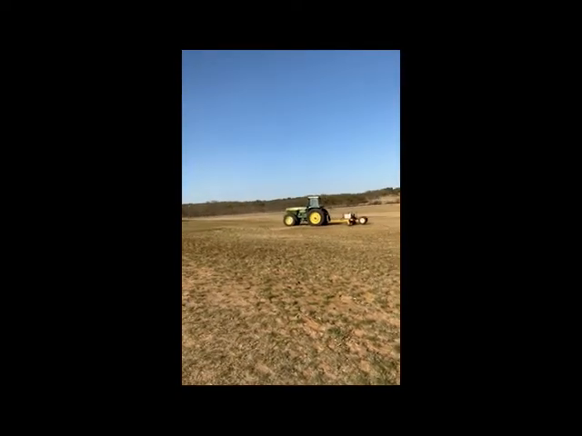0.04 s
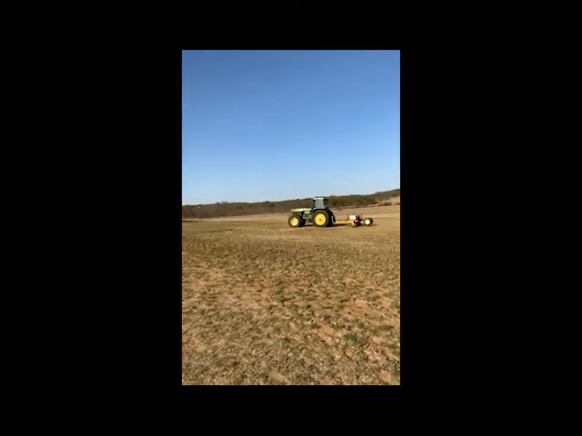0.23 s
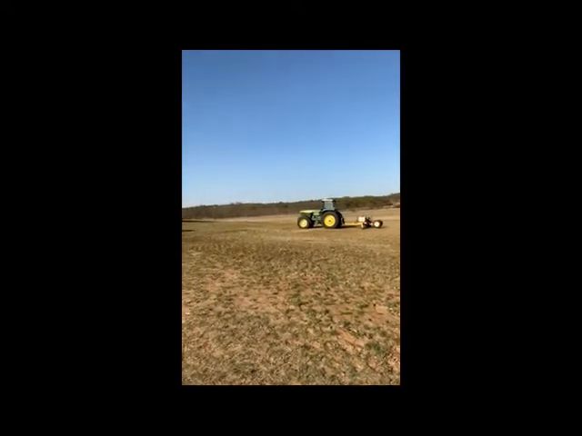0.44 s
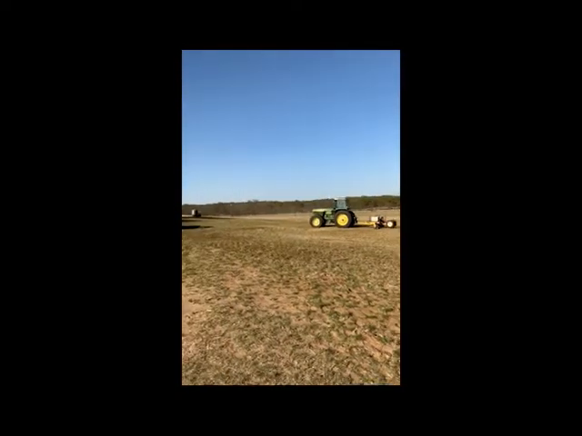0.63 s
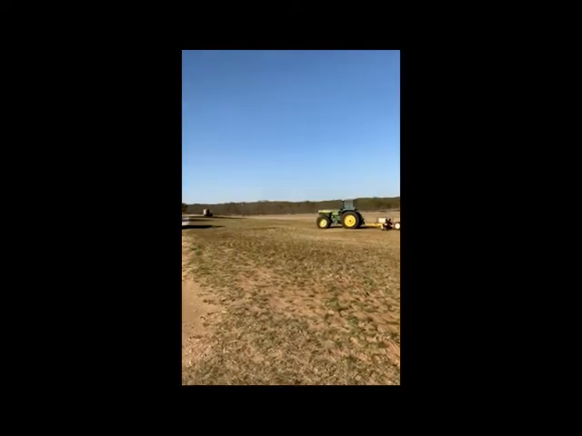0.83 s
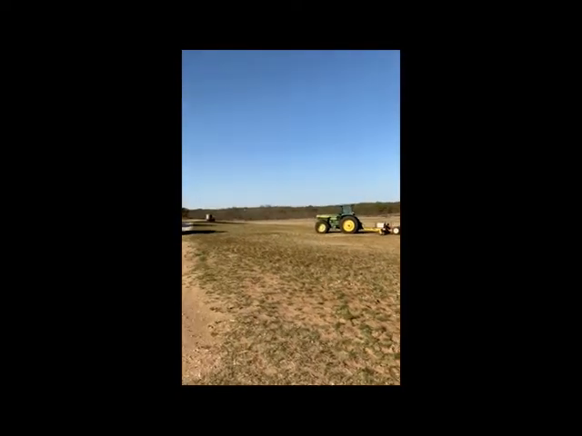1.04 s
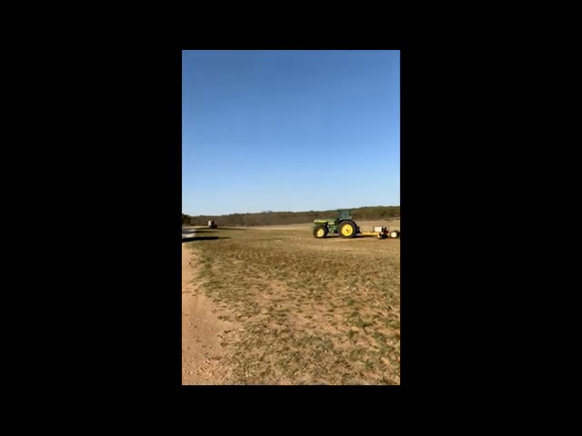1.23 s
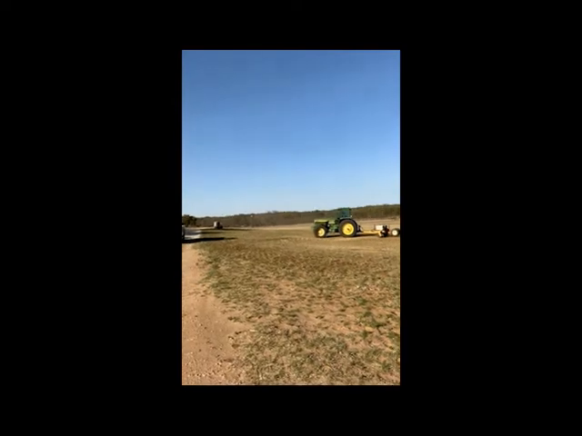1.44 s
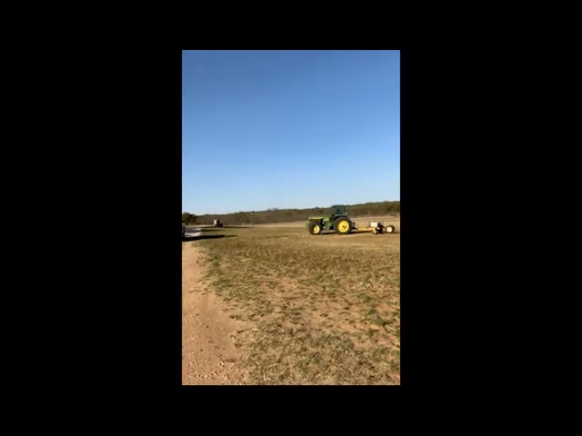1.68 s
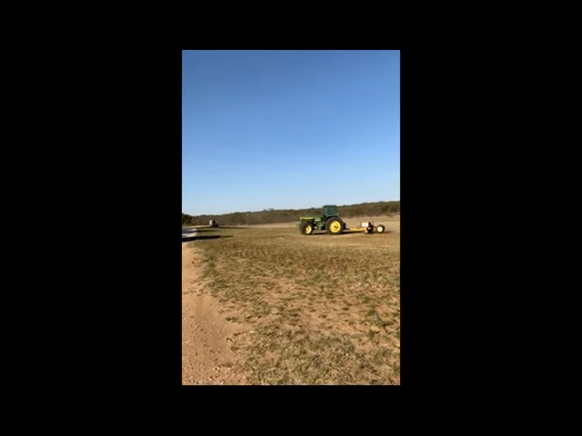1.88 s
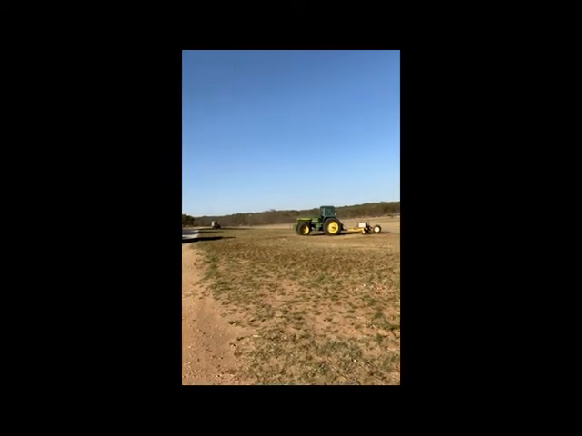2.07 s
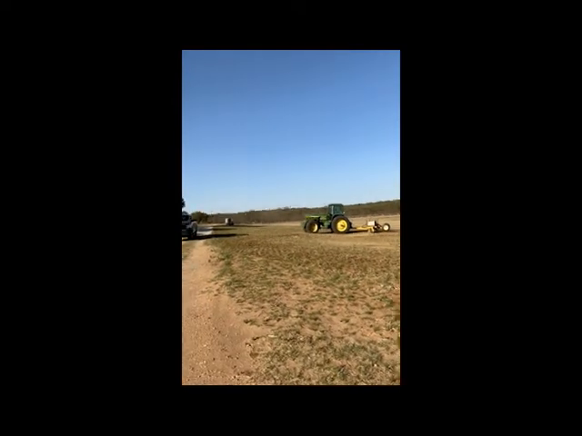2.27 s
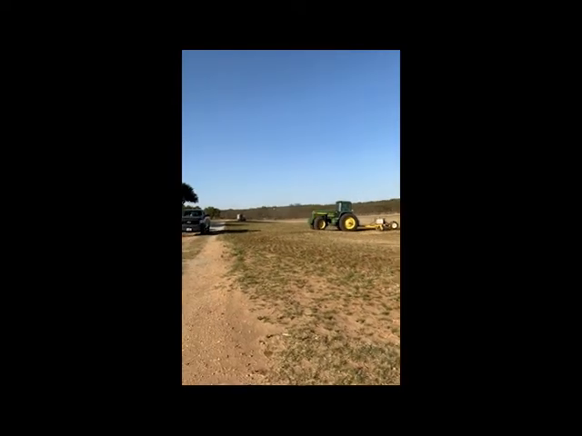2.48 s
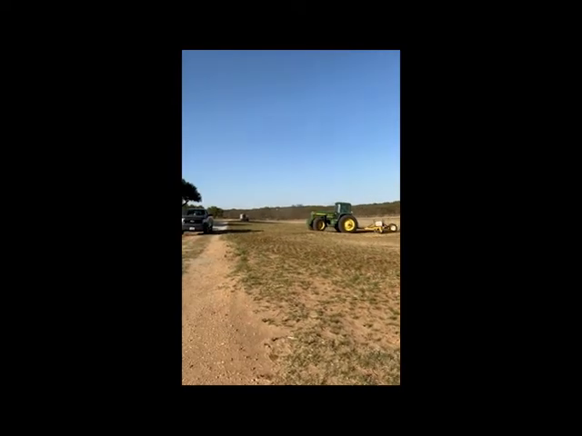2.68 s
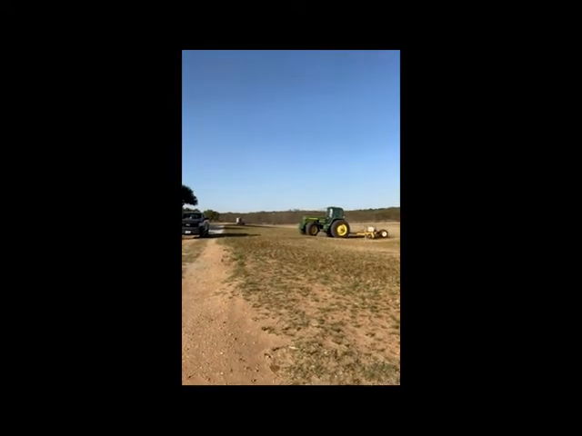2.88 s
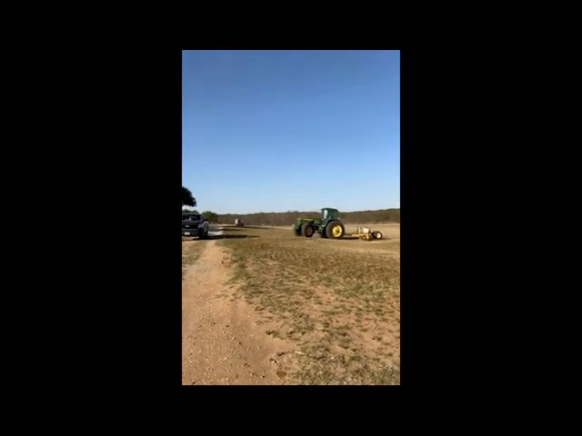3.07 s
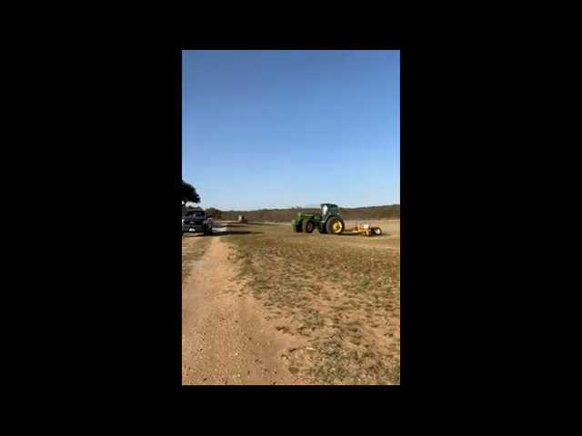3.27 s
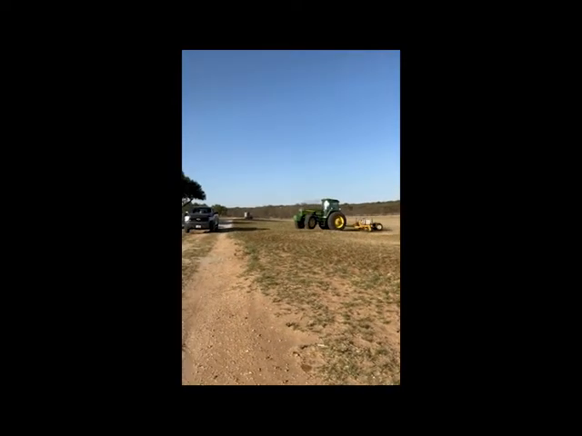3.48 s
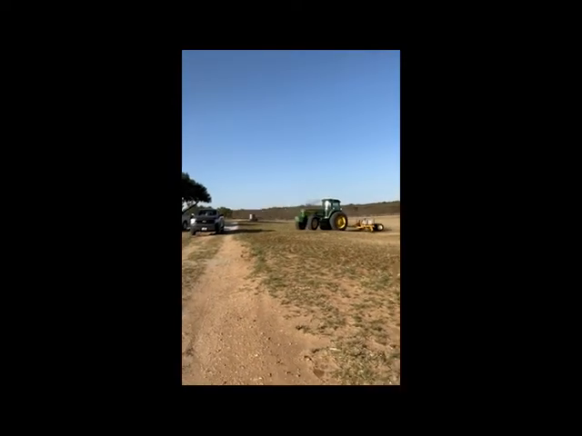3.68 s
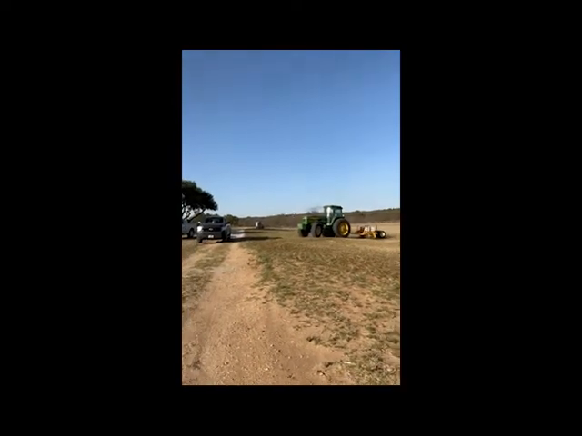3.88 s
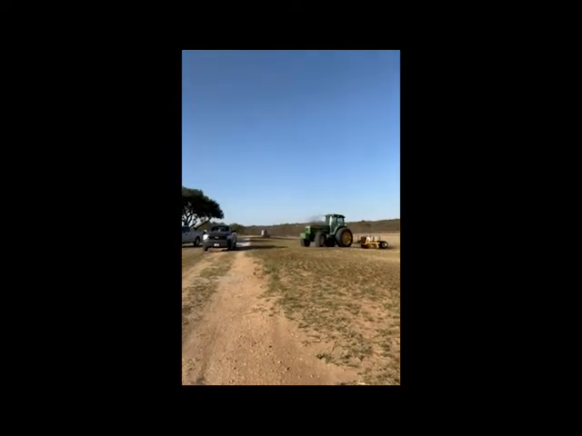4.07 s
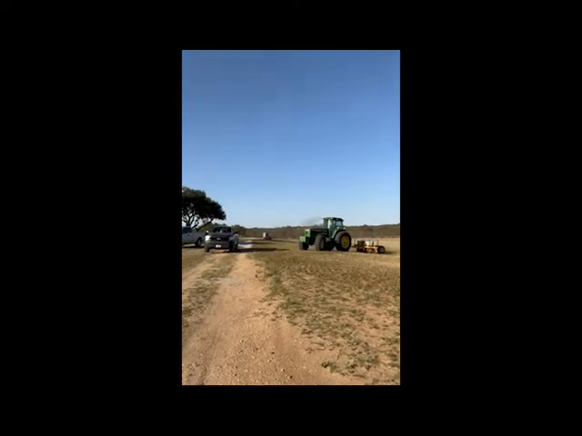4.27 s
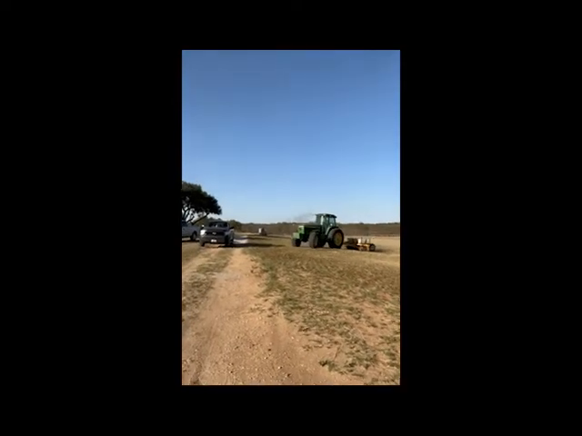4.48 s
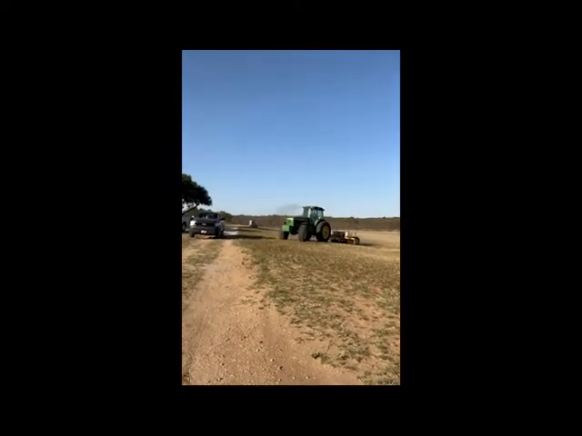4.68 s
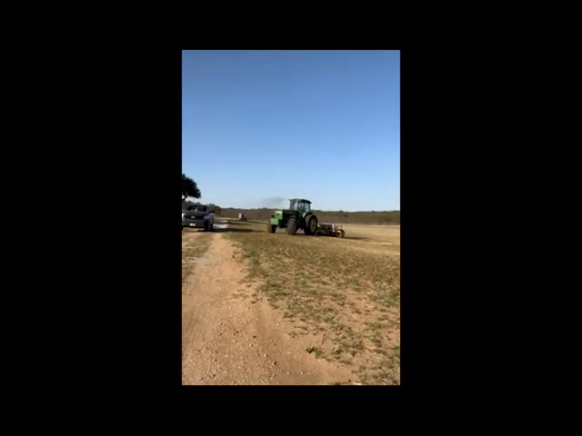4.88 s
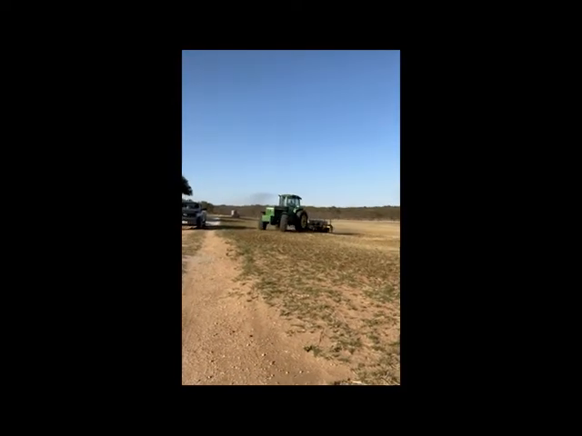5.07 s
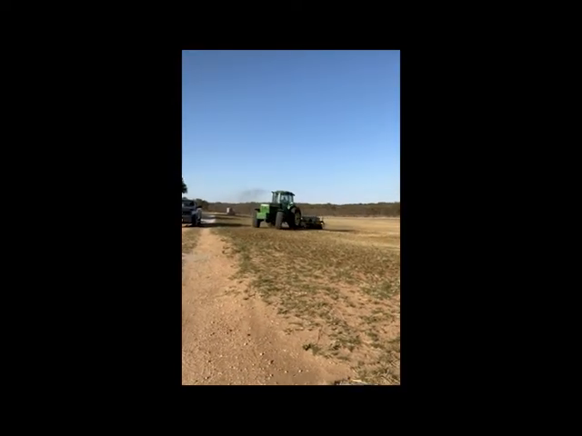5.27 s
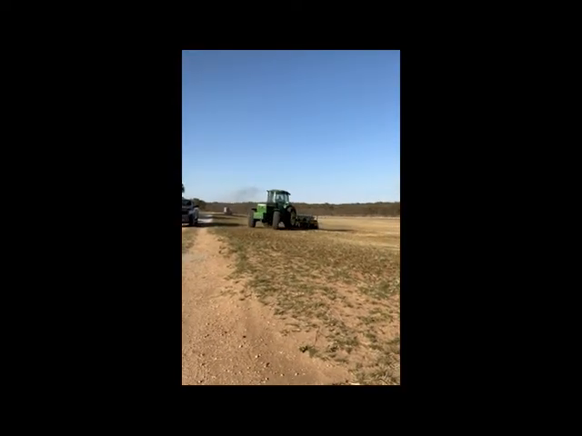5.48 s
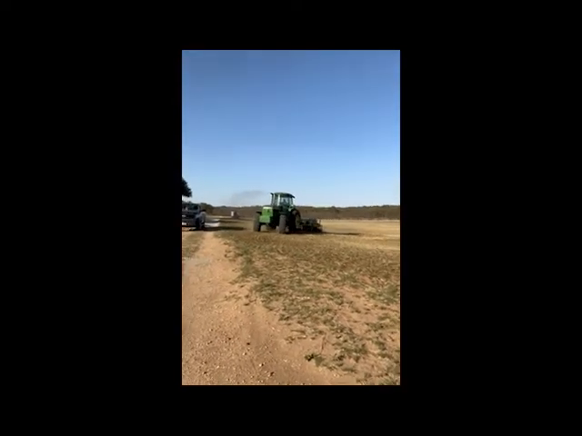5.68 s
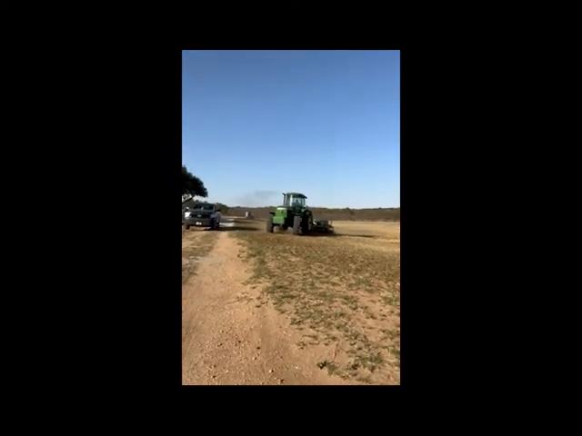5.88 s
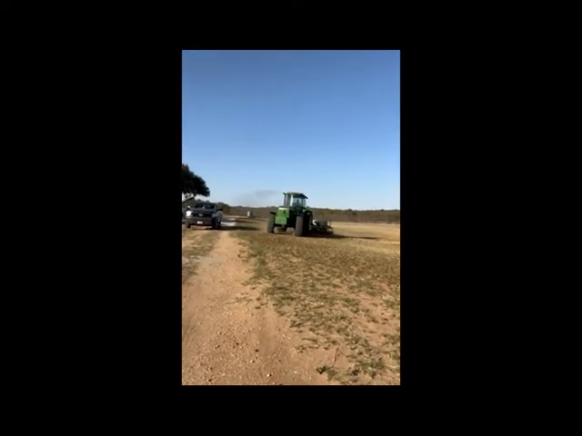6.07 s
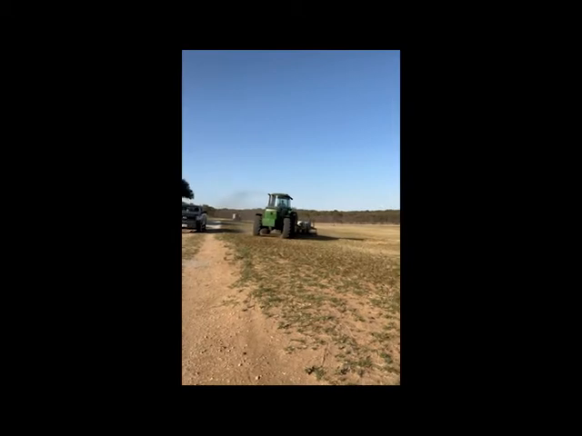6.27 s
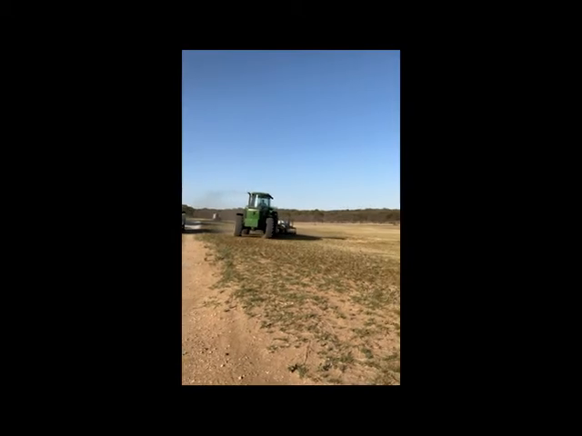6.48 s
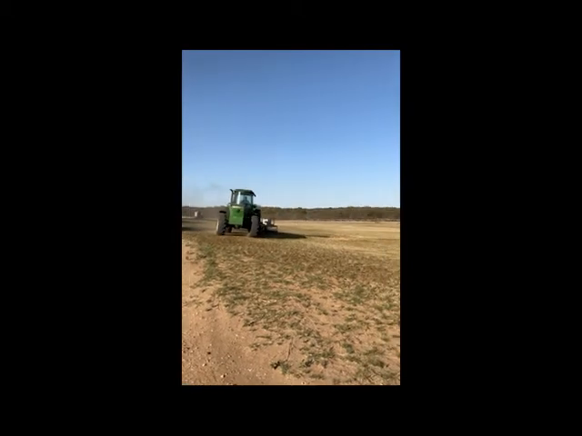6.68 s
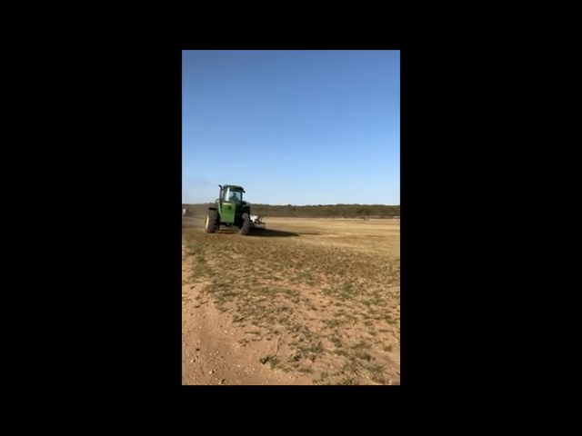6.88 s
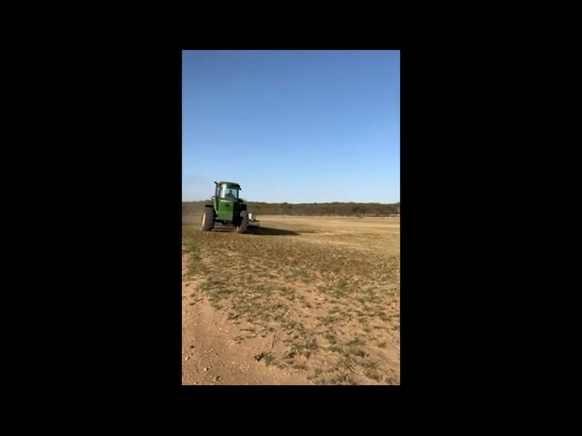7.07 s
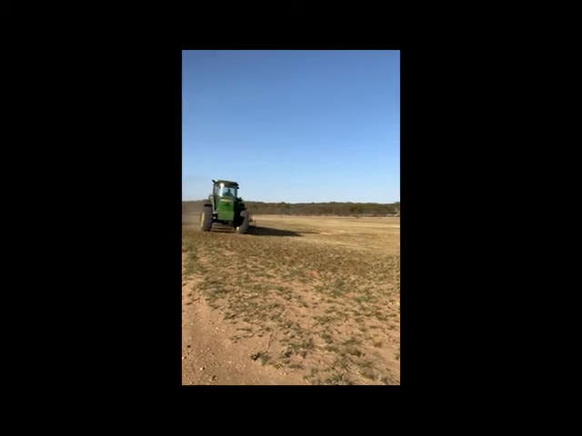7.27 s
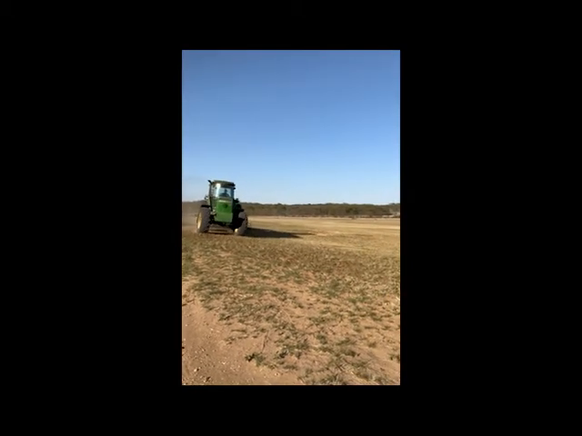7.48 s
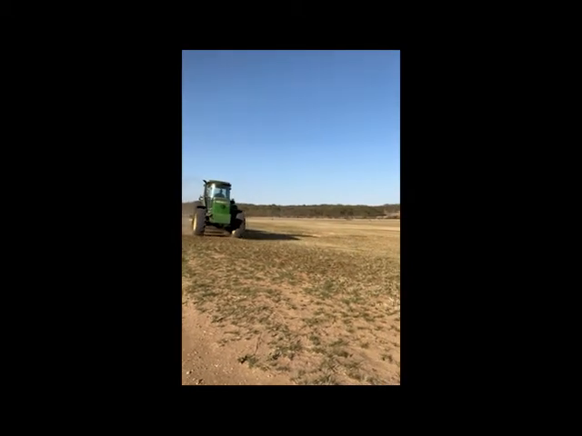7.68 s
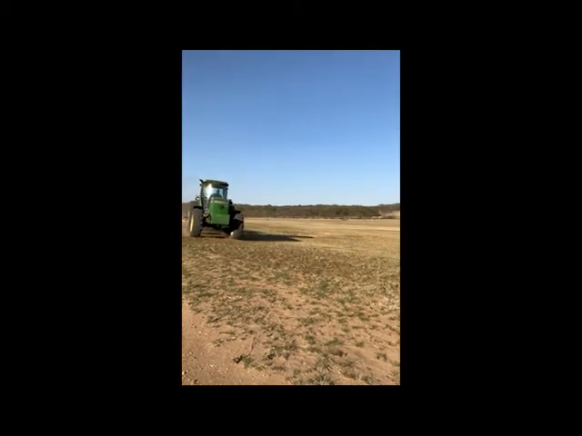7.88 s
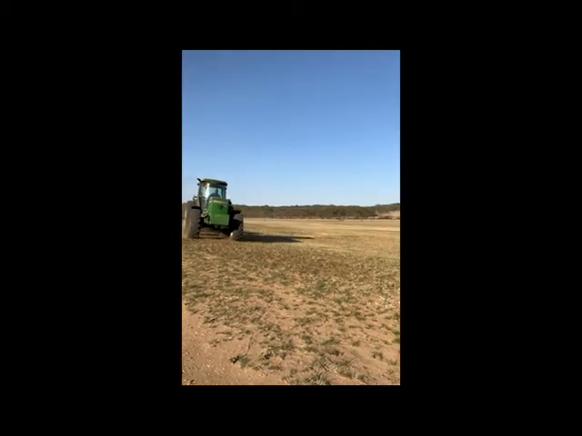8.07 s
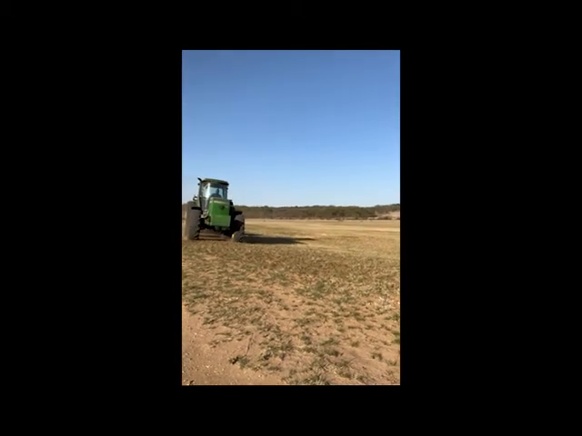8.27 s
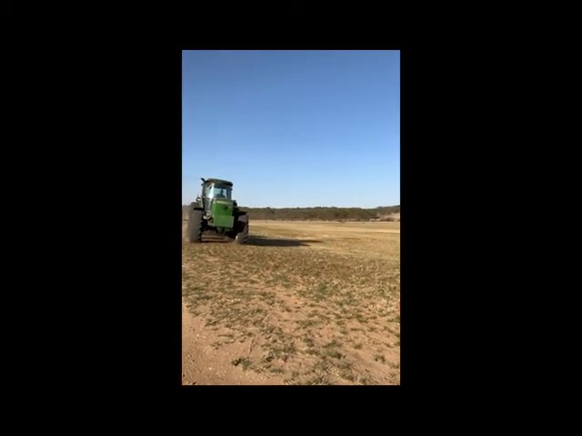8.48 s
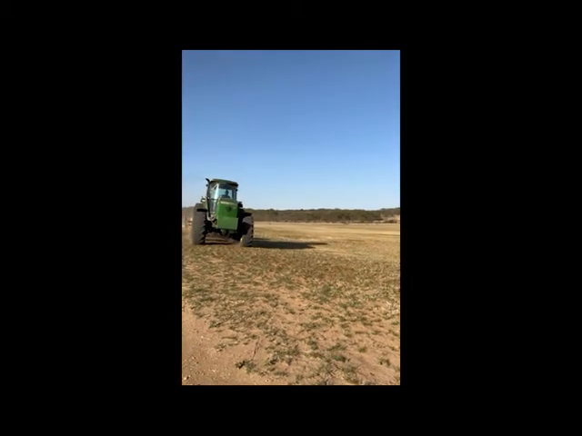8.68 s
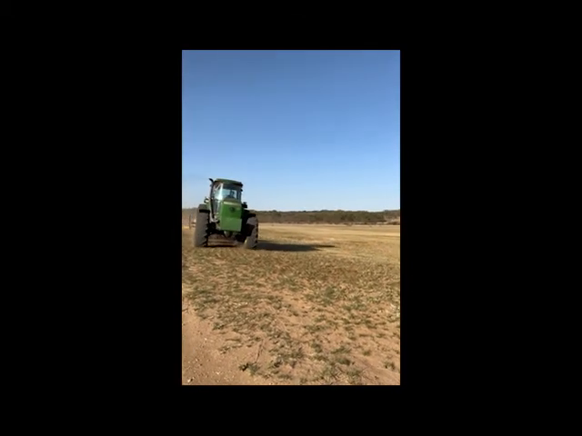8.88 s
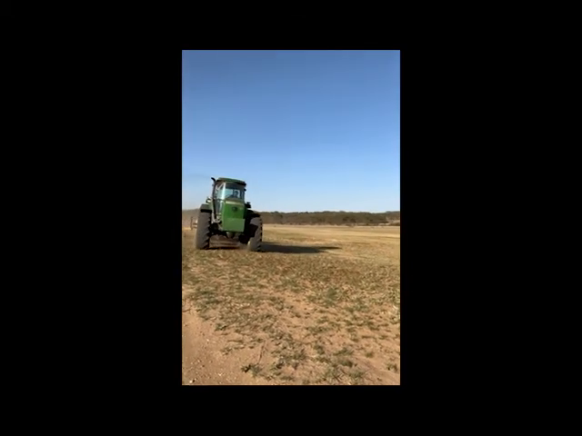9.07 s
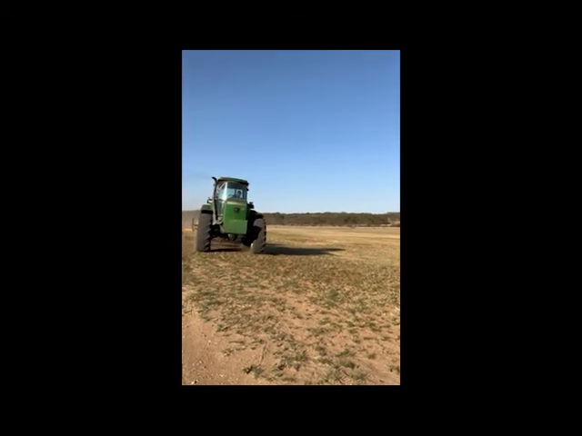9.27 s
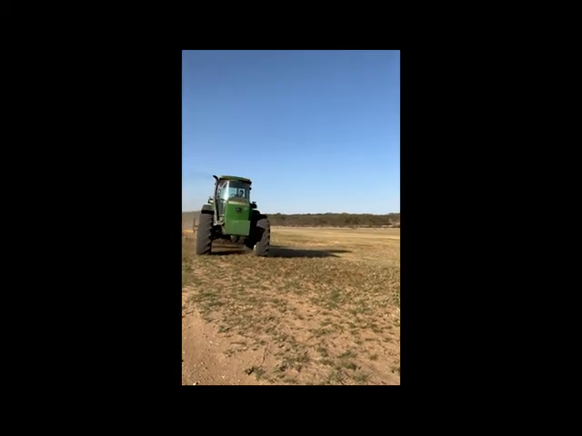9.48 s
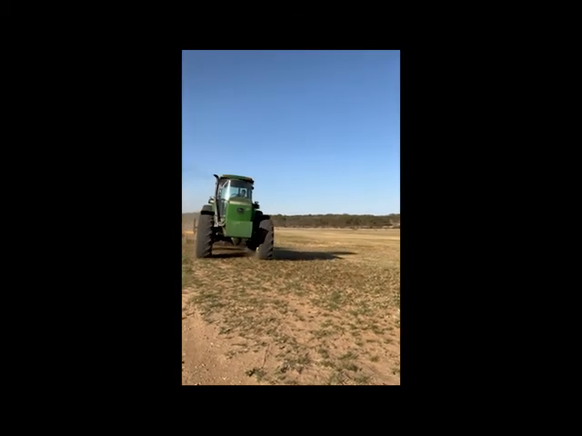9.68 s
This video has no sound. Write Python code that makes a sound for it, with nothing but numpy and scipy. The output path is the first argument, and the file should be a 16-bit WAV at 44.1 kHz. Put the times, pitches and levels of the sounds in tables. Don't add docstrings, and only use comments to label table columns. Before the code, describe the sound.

A diesel tractor drones low and steady across an open field, growing louder as it nears, with rattle, hiss and increasingly heavy wind buffeting the microphone.

```python
import sys
import numpy as np
from scipy import signal
from scipy.fft import rfft, irfft, next_fast_len
from scipy.io import wavfile

SR = 44100
rng = np.random.default_rng(int(sys.argv[2]) if len(sys.argv) > 2 else 0)


def invert_db(level):
    return 10 ** (np.asarray(level, dtype=float) / 20)


def master(y):
    cut = np.clip(np.atleast_2d(y).T, -1, 1)
    pcm = np.round(cut * 32767)
    wavfile.write(sys.argv[1], SR, pcm.astype(np.int16))


N = 429093
SIZE = next_fast_len(N)
HZ = np.maximum(np.arange(SIZE // 2 + 1) * SR / SIZE, 1)


def rms_one(x):
    return x / np.sqrt(np.mean(x ** 2) + 1e-20)


def in_time(rows):
    s, *columns = np.transpose(rows)
    return [np.interp(np.arange(N) / SR, s, c) for c in columns]


def at_hz(points):
    hz, value = np.transpose(points)
    return np.interp(np.log(HZ), np.log(hz), value)


def drift(rate):
    step = 40
    r = np.exp(-2 * np.pi * step * rate / SR)
    slow = signal.lfilter([1], [1, -2 * r, r * r], rng.standard_normal(N // step + 2002))
    slow = rms_one(slow[2000:])
    return np.interp(np.arange(N) / step, np.arange(len(slow)), slow)


def bumps(rows):
    t = np.arange(0, N, 32) / SR
    lifts = []
    for s, db, length in rows:
        lifts.append(db * np.exp(-4 * np.log(2) * ((t - s) / max(length, .03)) ** 2))
    return np.interp(np.arange(N) / SR, t, np.max(lifts, axis=0))


def patchy(spectrum, low_hz, high_hz, patchy_db, rate, count):
    place = np.clip(np.log(HZ / low_hz) / np.log(high_hz / low_hz), 0, 1) * (count - 1)
    together, out = drift(rate), 0
    for k in range(count):
        band = irfft(spectrum * np.clip(1 - abs(place - k), 0, 1), SIZE)[..., :N]
        out = out + band * invert_db(patchy_db * (0.5 * together + drift(rate)))
    return rms_one(out)


def sliding(x, tables, widths_hz):
    hz, s, frames = signal.stft(x, SR, nperseg=1024)
    shape_db = 0
    for rows, width_hz in zip(tables, widths_hz):
        at, *columns = np.transpose(rows)
        for centre_hz, lift_db in (columns[:2], columns[2:]):
            away = (hz[:, None] - np.interp(s, at, centre_hz)) / width_hz
            shape_db = shape_db + np.interp(s, at, lift_db) * np.exp(-4 * np.log(2) * away ** 2)
    return signal.istft(frames * invert_db(shape_db), SR, nperseg=1024)[1][:, :N]


# f/Hz, phase [rad]
PORT_PHASE = [(0, 0), (1400, .1), (1720, .6), (2000, -.2), (2400, -.1), (2760, 1.2), (3100, .9), (3270, 0),
              (5000, .35), (5600, 1.1), (7400, 2.2), (8350, 3.14), (10200, 3.14), (10700, 3.9),
              (13200, 5.8), (14200, 6.28)]
# f/Hz, likeness [0-1]
PORT_LIKENESS = [(100, .995), (900, .985), (1350, .99), (1800, .7), (2400, .8), (2900, .9), (3200, .6),
                 (3500, .998), (5000, .95), (7500, .9), (8500, .978), (10000, .98), (11300, .75),
                 (13000, .99)]


def ports(common, own):
    hz, lead = np.transpose(PORT_PHASE)
    half = np.interp(HZ, hz, lead) / 2
    alike = np.clip(at_hz(PORT_LIKENESS), 0, 1)
    shared = np.sqrt(alike) * rfft(common, SIZE) * np.exp(1j * half * [[1], [-1]])
    return shared + np.sqrt(1 - alike) * rfft(own, SIZE)


# t/s, firing rate [1/s]
SPEED = [(0, 84.61), (.8, 84.47), (1.2, 84.61), (1.6, 85.06), (2, 85.06), (2.4, 84.2), (2.8, 83.8),
         (3.2, 83.9), (3.6, 83.55), (4, 83.92), (4.8, 85.12), (5.6, 85.39), (6.8, 86.24), (7.2, 85.93),
         (8, 86.26), (8.8, 85.83), (9.73, 85.85)]


def firing_count():
    return .247 + np.cumsum(in_time(SPEED)[0]) / SR


CYLINDER_DB = [-1, -7, 0, -5, 2, -6]


def puffs(firings, depth_db, fall):
    stroke, part = np.divmod(firings, 1)
    stroke = stroke.astype(int)
    chance_db = 1.5 * rng.standard_normal(stroke.max() + 1)
    strength_db = np.array(CYLINDER_DB)[stroke % 6] + chance_db[stroke]
    shape = invert_db(strength_db) * np.exp(-fall * part) * np.clip(part / .05, 0, 1)
    return 1 + (invert_db(depth_db) - 1) * shape


# t/s, exhaust outlet level/dB, engine bay level/dB
APPROACH = [(0, -24, -34), (.8, -22.5, -36.5), (1.6, -23, -36.5), (2.35, -21.5, -35.5), (2.95, -19.5, -38),
            (3.5, -17.5, -34), (4.2, -17, -33), (4.6, -15.5, -31), (5.45, -15.5, -30.5),
            (5.8, -13.5, -27.5), (6.5, -13, -29), (7, -13.5, -34), (7.5, -13, -27), (8.5, -12, -27.5),
            (8.8, -11.5, -23.5), (9.4, -12, -22.5), (9.73, -12, -25.5)]


def approach():
    return in_time(APPROACH)


# order, level/dB re firing tone
SIDE_ORDERS = [(3, -37), (4, -26), (5, -21.5), (7, -34), (11, -42), (13, -35.5), (16, -26), (18, -28.5)]
# t/s, level/dB re firing tone
FAN_DB = [(0, -17), (1.7, -19), (2.2, -30), (2.7, -17), (3.9, -20), (4.3, -32), (5, -21), (6, -24),
          (6.8, -32), (8, -23), (9.73, -28)]


def exhaust(firings, tone_db):
    turn = 2 * np.pi * firings
    octave_db = -30.5 + 0.49 * (tone_db + 17)
    note = invert_db(tone_db + 1.1 * drift(23)) * np.cos(turn)
    note = note + invert_db(octave_db - .5 + 2.0 * drift(2.4) + 1.5 * drift(9)) * np.cos(2 * turn + 1.5)
    for order, order_db in SIDE_ORDERS:
        wander = .5 * drift(0.7) + rng.uniform(0, 2 * np.pi)
        note = note + invert_db(tone_db + order_db + 2.5 * drift(3)) * np.cos(order / 6 * turn + wander)
    fan_order = 3.09
    fan_db = tone_db + in_time(FAN_DB)[0] + 1.5 * drift(4)
    note = note + invert_db(fan_db) * np.cos(fan_order * turn + .4 * drift(1))
    return np.sqrt(2) * note


# f/Hz, level/dB per Hz
BLOCK = [(250, 3), (430, -6), (600, -2), (700, -5), (930, -0.5), (1100, 1.5), (1350, 3), (1550, -2.5),
         (1750, -10.5), (2050, -9.5), (2400, -10), (2800, -4.5), (3100, -12), (3300, -24)]
# t/s, lower f/Hz, level/dB, upper f/Hz, level/dB
DIPS = [(0, 1720, -2, 2150, 1), (.8, 1720, -7, 2230, -3), (1.3, 1800, -6, 2000, -2),
        (2, 1710, -2, 2180, -1), (2.7, 1840, -1, 2243, -9), (3.3, 1760, -9, 2160, -5.5),
        (3.75, 1690, -8, 1950, -3), (4.1, 1600, -3, 2030, -17), (4.55, 1760, -5, 2150, -9),
        (4.9, 1535, -4.5, 1820, -9), (5.3, 1520, -5, 1970, -7), (5.7, 1580, -4, 2170, -4.5),
        (6.2, 1610, -7, 2220, -1), (6.6, 1888, -9, 2800, -0.5), (7.2, 1850, -7, 2860, -8),
        (8.6, 1830, -13, 2820, -4), (9.25, 1820, 1, 2830, -4.5), (9.73, 1870, -8, 2830, -3)]
# t/s, lower f/Hz, level/dB, upper f/Hz, level/dB
PANELS = [(0, 1076, 12, 1380, 7.5), (.7, 1090, 10, 1370, 3.5), (1.3, 1170, 4, 1390, 5.5),
          (1.75, 1050, -1, 1397, 3.5), (2.3, 1200, 9.5, 1540, 8), (2.9, 1165, 9, 1450, -4),
          (3.6, 1192, 4, 1360, 4), (4.3, 1190, 2.5, 1380, 2.5), (4.8, 1210, 1, 1330, -0.5),
          (5.3, 1004, 3, 1330, 1.5), (5.8, 1060, -7.5, 1250, 1.5), (6.7, 1060, 3.5, 1280, 4),
          (7.5, 1060, -3, 1310, -4.5), (9, 1000, 2.5, 1380, -5), (9.73, 1050, 4.5, 1300, 3.5)]


def block(firings, block_db, swell_db):
    knock_db = -39 + 0.067 * (block_db + 33) + 0.43 * swell_db
    noise = rng.standard_normal((3, N)) * puffs(firings, 5.5, 2.5)
    shares = np.array([drift(.6) for _ in range(4)])
    shares = shares / np.sqrt(np.sum(shares ** 2, axis=0))
    cycle = 0
    for share in shares:
        cycle = cycle + share * np.interp(firings * 100 % 600, np.arange(601), rng.standard_normal(601))
    rattle = .7 * rms_one(cycle * puffs(firings, 8, 2.5))
    spectrum = ports(rms_one(noise[0]) + rattle, rms_one(noise[1:])) * invert_db(at_hz(BLOCK))
    spectrum = spectrum * np.clip(HZ / 250, 0, 1) ** 2 / (1 + (HZ / 3400) ** 30)
    upper = 1 / (1 + (1750 / HZ) ** 12)
    low = patchy(spectrum * (1 - upper), 190, 1820, 1.0, 18.0, count=8)
    high = patchy(spectrum * upper, 2100, 2930, 1.1, 2.8, count=5)
    casting = invert_db(block_db - 0.5) * low + invert_db(knock_db + 0.07) * high
    return sliding(casting, (DIPS, PANELS), widths_hz=(290, 180))


# multiple of firing rate, start t/s, end t/s,
# level/dB re firing tone
GEARS = [(7, 0, 2.8, -27), (11, 0, 1.8, -26), (12, 0, 2.3, -22), (12.5, 0, 1, -26), (13, 0, 1.2, -18),
         (13.333, 0, 1.8, -21), (13.667, 0, 1.8, -24), (15.5, 0, .9, -24), (14.333, .8, 1.6, -26),
         (16.5, .8, 1.8, -27), (13.5, 2, 2.6, -24), (14.5, 2, 2.6, -24), (7.64, 2.4, 5.6, -29),
         (4.5, 3.2, 4.3, -28), (14.5, 3.3, 4.2, -28), (12.5, 4, 5.1, -30), (13.5, 4.1, 5.9, -25),
         (14.667, 4.2, 5.3, -28), (15.5, 4.4, 5.1, -28), (12, 4.9, 6.9, -31), (14.5, 5, 7, -30),
         (15.333, 5.5, 6.3, -30), (12.5, 5.8, 7.6, -31), (11.333, 6.6, 8.2, -33), (14.667, 6.9, 9.73, -29),
         (13, 6.6, 9.73, -25.5), (15.5, 7.6, 8.9, -30), (16.667, 7, 9.4, -34), (17.5, 7.8, 9, -34)]


def gears(firings, tone_db):
    t, out = np.arange(N) / SR, np.zeros(N)
    for order, start, end, gear_db in GEARS:
        on = slice(max(round((start - .2) * SR), 0), round((end + .2) * SR))
        fade = np.clip(np.minimum(t[on] - start, end - t[on]) / .4 + .5, 0, 1)
        waver = 2 * np.pi * rng.uniform(0, 1, 2) + np.outer(t[on], rng.uniform(6, 14, 2))
        level = fade * invert_db(gear_db + 2.5 * np.sin(waver[:, 0]))
        phase = 2 * np.pi * order * firings[on] + rng.uniform(0, 6) + .5 * np.sin(waver[:, 1])
        out[on] += level * np.cos(phase)
    return np.sqrt(2) * invert_db(tone_db) * out


# t/s, low f/Hz, low level/dB, high f/Hz, high level/dB
BONNET = [(0, 574, -70, 2300, -58), (.6, 578, -57, 2320, -41), (.8, 579.5, -56, 2336, -47),
          (1, 574, -62, 2370, -41), (1.2, 581, -51, 2440, -48), (1.55, 589, -44.5, 2490, -42),
          (2, 584.5, -42, 2470, -47), (2.5, 590, -40.5, 2515, -47.5), (3, 592.5, -39.5, 2560, -49),
          (3.4, 602, -40, 2410, -50), (3.8, 623, -38, 2430, -42), (4.5, 635, -50, 2550, -44.5),
          (4.9, 639, -48, 2400, -52), (5.3, 640, -53, 2320, -48), (6, 627, -67, 2400, -45.5),
          (6.5, 644, -56, 2330, -51), (7.1, 633, -65, 2350, -46.5), (7.6, 650, -60, 2370, -48.5),
          (8.3, 666, -55.5, 2380, -42.5), (9.73, 660, -56, 2370, -44)]


def bonnet():
    low_hz, low_db, high_hz, high_db = in_time(BONNET)
    high_db = high_db + 0.5 + 1.2 * drift(4.5)
    out = 0
    for hz, level_db, width_hz in ((low_hz, low_db, 38), (high_hz, high_db, 45)):
        turn = 2 * np.pi * np.cumsum(hz) / SR
        out = out + invert_db(level_db) * (drift(width_hz) * np.cos(turn) + drift(width_hz) * np.sin(turn))
    return out


# middle t/s, lift level/dB, length [s]
SWELLS = [(.1, 2.5, 0.26), (.75, 3, 0.49), (2.15, 5, 0.22), (2.4, 5.5, 0.35), (2.95, 4, 0.21),
          (3.16, 4, 0.48), (3.52, 5.5, 0.13), (3.68, 6, 0.2), (3.95, 5, 0.26), (4.42, 5, 0.28),
          (4.7, 3.5, 0.39), (5.1, 2.5, 0.4), (5.85, 3, 0.7), (6.56, 2.5, 0.12), (7.91, 1.5, 0.088),
          (9.4, 2, 1)]


def swells():
    return bumps(SWELLS)


# f/Hz, level/dB, t60 [s]
TAPPET = [
    (4720, 1, .024),
    (6000, -3, .008),
    (5350, -9, .006),
]


def tappets(firings):
    stroke = np.floor(firings).astype(int)
    at = np.flatnonzero(np.diff(stroke)) + 1
    out = 0
    for hz, level_db, t60 in TAPPET:
        cylinder_db = 1.5 * np.array(CYLINDER_DB)[stroke[at] % 6]
        clicks = np.full(N, 1e-18)
        clicks[at] = invert_db(level_db + cylinder_db + 2.5 * rng.standard_normal(len(at)))
        r, w = invert_db(-60 / (t60 * SR)), 2 * np.pi * hz / SR
        out = out + signal.lfilter([0, np.sin(w)], [1, -2 * r * np.cos(w), r * r], clicks)
    out = rms_one(out)
    band = 1 / (1 + (HZ / 7000) ** 16) / (1 + (4000 / HZ) ** 16)
    scattered = out * rng.choice([-1, 1], (2, N))
    return irfft(band * ports(out, scattered), SIZE)[:, :N]


# f/Hz, level/dB per Hz
STACK = [(3300, -12.5), (3600, -10.5), (4100, -8.5), (4550, -9.5), (4700, -11.5), (4900, -9.5), (5300, -12),
         (6200, -13.5), (7200, -19.5), (8500, -24.5), (10000, -26), (11200, -31), (13600, -38),
         (15700, -54)]
# f/Hz, level/dB per Hz
VALVE = [(3300, -16), (4300, -18.5), (4700, 5), (5200, -9), (6000, 15.5), (7000, 1.5), (9500, -36),
         (12000, -25.5), (15700, -55.5)]


def stack(firings, swell_db, boost_khz):
    hiss_db = -40 - 0.5 * boost_khz + swell_db
    depth_db = 4 - .3 * np.arange(N) / SR + 0.6 * swell_db
    edge = 1 / (1 + (3200 / HZ) ** 30)
    noise = rng.standard_normal((3, N)) * puffs(firings + 5.3, depth_db, 2.2)
    gas = ports(noise[0], noise[1:]) * invert_db(at_hz(STACK)) * edge
    top = 1 / (1 + (9700 / HZ) ** 24)
    air = patchy(gas * top, 10200, 15000, 2.6, 12, count=8)
    hiss = patchy(gas * (1 - top), 3300, 8000, 1.3, 29, count=4)
    hiss = hiss + invert_db(-18.5 - 0.5 * boost_khz) * air
    noise = rng.standard_normal((3, N)) * (puffs(firings + 5.27, 6, 6) - 1)
    snaps = rms_one(irfft(ports(noise[0], noise[1:]) * invert_db(at_hz(VALVE)) * edge, SIZE)[:, :N])
    rings = invert_db(2.13 * depth_db - 17) * tappets(firings + 5.3)
    return invert_db(hiss_db - 0.5) * (hiss + invert_db(2.0 * depth_db - 21) * snaps + rings)


# t/s, share [0-1]
STACK_SHADE = [
    (6.4, 0),
    (6.8, 0.57),
    (8.6, 0.2),
    (9.1, .1),
]


def cab_shade(gas):
    band = signal.butter(1, [3100, 3800], "band", fs=SR, output="sos")
    return gas - in_time(STACK_SHADE)[0] * signal.sosfilt(band, gas)


# t/s, f/Hz, level/dB
TURBO = [(0, 11360, -62), (1.3, 11730, -69), (1.92, 11400, -63), (2.44, 12040, -59), (2.9, 12400, -63),
         (3.1, 12600, -50), (3.35, 12750, -56), (3.55, 12900, -46.5), (4.1, 13120, -56.5),
         (4.4, 12950, -47.5), (5.42, 12315, -54), (6.3, 11540, -62), (6.85, 11000, -69),
         (7.6, 10800, -61.5), (8.25, 10590, -54), (9.13, 10740, -58), (9.73, 10960, -58)]


def turbo(firings):
    hz, level_db = in_time(TURBO)
    turns = np.cumsum(hz + 90 * drift(160) + 40 * drift(11)) / SR
    throb_db = 3.5 * np.cos(np.pi * firings - 1.9) + 3 * drift(60) + 2 * drift(8)
    skirt = 1 + invert_db(-9) * drift(250)
    whistle = invert_db(level_db + throb_db) * skirt * np.cos(2 * np.pi * turns)
    return irfft(ports(whistle, whistle * [drift(150), drift(150)]), SIZE)[:, :N]


# t/s, buffet on both ports level/dB, flutter across the ports level/dB
WIND = [(0, -36.5, -60), (.5, -30.5, -48.5), (2.05, -36, -44.5), (2.7, -27.5, -43), (3.8, -31, -32.5),
        (4.05, -27.5, -44), (5.3, -31, -41), (5.95, -23, -37.5), (6.3, -23, -28), (7.2, -21.5, -29.5),
        (8.6, -16.5, -24.5), (8.9, -13.5, -18), (9.73, -17.5, -16)]
# middle t/s, lift level/dB, length [s]
GUSTS = [(.08, 5, 0.074), (.27, 9, 0.13), (.55, 3, 0.055), (.71, 6.5, 0.043), (.91, 2, 0.056),
         (1.33, 13.5, 0.045), (1.46, 5.5, 0.28), (1.89, 12.5, 0.27), (2.03, 8, 0.13), (2.2, 7.5, 0.14),
         (2.37, 7, 0.093), (2.7, 7.5, 0.058), (2.81, -2, .1), (3.03, 2.5, 0.046), (3.77, 4.5, 0.14),
         (4.15, 6.5, 0.12), (4.37, 10, 0.16), (4.67, 2, 0.066), (5.12, 3.5, 0.21), (5.53, 10, 0.083),
         (5.61, 16, 0.042), (5.68, 2, .08), (5.9, -4, 0.046), (6.155, 11, 0.066), (6.27, 8.5, 0.18),
         (6.41, 7.5, 0.092), (6.67, 12, 0.024), (6.748, 14.5, 0.029), (7.04, 3.5, 0.43), (7.44, 4.5, 0.052),
         (7.79, 3.5, 0.1), (8.19, 1.5, 0.063), (8.5, 6.5, 0.11), (8.77, 2, 0.087), (8.9, 3.5, 0.082),
         (9.425, 7, 0.048)]
# middle t/s, drop level/dB, length [s]
LULLS = [
    (6.595, 13, 0.076),
    (6.86, 2, 0.054),
    (9.1, 11, 0.024),
    (9.3, 8, 0.033),
    (9.55, 4.5, 0.19),
]
# middle t/s, lift level/dB, length [s]
CROSS_GUSTS = [(.35, 5, .05), (.48, 11, 0.054), (.57, 10, 0.046), (.67, 9, .06), (.95, 7, .07),
               (1.12, 11, 0.077), (1.39, 9, 0.068), (1.51, 14, 0.11), (1.84, 1, 0.047), (2.2, 9, 0.056),
               (2.3, 16, 0.047), (2.53, 14, 0.054), (2.62, 11, .06), (2.82, 17, 0.09), (2.98, 14, 0.15),
               (3.32, 8, 0.097), (3.53, 7, 0.089), (3.63, 4, .05), (3.73, 11, 0.048), (3.79, 8, 0.075),
               (3.92, 8, 0.066), (4.11, 7, 0.073), (4.29, 9, 0.098), (4.62, 16, 0.1), (4.77, 9, 0.051),
               (4.88, 9, .06), (5.07, 16, 0.042), (5.45, 1, .06), (5.68, 2, .14), (6.13, 8, 0.042),
               (6.19, 6, 0.043), (6.49, 9.5, 0.039), (6.6, 12, 0.19), (6.86, 8, 0.12), (7.37, 2, .07),
               (7.58, 4, 0.077), (7.7, 5, .07), (8.76, 1.5, 0.083), (9.16, -18, 0.2)]


def wind_levels():
    breeze_db = in_time(WIND)
    gusty_db = np.array([bumps(GUSTS) - bumps(LULLS), bumps(CROSS_GUSTS)])
    return breeze_db + gusty_db, breeze_db


# f/Hz, level/dB per Hz
BUFFET = [(20, -26.5), (30, -18), (45, -4.5), (65, -0.5), (110, -4), (200, -10), (300, -15), (450, -21),
          (900, -33), (2400, -61.5), (4000, -100.5)]
# f/Hz, level/dB per Hz
FLUTTER = [(20, -28), (30, -25), (60, 2), (110, 4), (300, -4.5), (700, -13), (1000, -19.5), (1500, -33),
           (2500, -25.5), (4000, -65)]


def wind(gusts_db, breeze_db):
    high_pass = signal.butter(2, 400, "high", fs=SR, output="sos")
    low_pass = signal.butter(2, 48, "low", fs=SR, output="sos")
    kinds = zip(gusts_db, breeze_db, (BUFFET, FLUTTER), (1, -1), (.4, .3))
    out = 0
    for gust_db, calm_db, spectrum, sign, lift in kinds:
        lumps_db = 5.2 * np.tanh(drift(40) / 2)
        noise = rfft(rng.standard_normal(N) * invert_db(lumps_db), SIZE) * invert_db(at_hz(spectrum))
        both = patchy(noise, 24, 1100, 2.2, 17.4, count=6)
        bright = signal.sosfilt(high_pass, both)
        deep_db = -.55 * (calm_db + 21.5) * (sign > 0)
        deep = signal.sosfilt(low_pass, both) * (invert_db(deep_db) - 1)
        tilt_db = lift * (calm_db + 31.5) + (lift - .5) * (gust_db - calm_db)
        out = out + invert_db(gust_db) * (both + deep + (invert_db(tilt_db) - 1) * bright) * [[1], [sign]]
    return out


def wind_guard(x, excess_db):
    band = (1 + (260 / HZ) ** 6) * (1 + (HZ / 1020) ** 8)
    low_middle = irfft(rfft(x, SIZE) / band, SIZE)[:, :N]
    return x - (1 - invert_db(-2 * np.maximum(excess_db - 3, 0))) * low_middle


# t/s, peak level/dB, low edge f/Hz, high edge f/Hz, decay [ms]
TICKS = [(5.381, -45, 6000, 15000, 4), (5.615, -43, 6000, 15000, 4), (5.683, -47, 8000, 15000, 3),
         (6.609, -37, 5000, 15000, 4), (6.785, -35, 5000, 15000, 3), (8.306, -23, 4500, 7000, 5),
         (8.306, -39, 9500, 15000, 4), (8.395, -33, 4500, 8000, 4), (8.551, -35, 4000, 15500, 4),
         (8.558, -38, 9000, 15500, 4), (8.97, -32, 5000, 11500, 3), (9.163, -38, 9500, 12500, 3),
         (9.190, -28, 4500, 10000, 4), (9.19, -43, 10000, 15500, 3), (9.622, -23, 2700, 7500, 6),
         (9.622, -40, 9000, 15500, 5)]
# t/s, peak level/dB, low edge f/Hz, high edge f/Hz, decay [ms]
KNOCKS = [(7.839, -17, 450, 1000, 8), (7.887, -15, 450, 1000, 8), (7.994, -22, 450, 1000, 7),
          (8.183, -17, 520, 750, 14), (8.467, -16, 450, 1000, 8), (8.744, -15, 550, 1200, 7),
          (8.901, -11, 500, 1200, 8), (8.93, -18, 380, 600, 10), (9.018, -16, 600, 1000, 12),
          (9.066, -14, 700, 950, 12), (9.135, -16, 750, 1400, 8), (9.172, -14, 700, 1900, 6),
          (9.208, -20, 1100, 1600, 7), (9.259, -19, 1700, 2400, 8), (9.365, -17, 800, 1200, 8),
          (9.406, -14, 700, 1200, 8), (9.477, -17, 800, 1400, 7)]


def ticks():
    out, t = np.zeros((3, N)), np.arange(1800) / SR
    for s, peak_db, low_hz, high_hz, decay_ms in TICKS + KNOCKS:
        burst = rng.standard_normal((3, len(t))) * np.exp(-1000 * t / decay_ms)
        burst[:, 0] = 2.2 * np.sqrt(SR / 2 / (high_hz - low_hz))
        band = signal.butter(3, [low_hz, high_hz], "band", fs=SR, output="sos")
        burst = signal.sosfilt(band, burst)
        at = round(s * SR)
        lift_db = 7 if low_hz > 2500 else 3
        out[:, at:at + len(t)] += invert_db(peak_db + lift_db) * burst / abs(burst).max()
    return irfft(ports(out[0], out[1:]), SIZE)[:, :N]


def scene():
    firings = firing_count()
    outlet_db, bay_db = approach()
    swell_db = swells()
    boost_khz = in_time(TURBO)[0] / 1000 - 12
    gusts_db, breeze_db = wind_levels()
    casting = block(firings, bay_db, swell_db) + gears(firings, outlet_db) + bonnet()
    casting = wind_guard(casting, gusts_db[1] - gusts_db[0])
    gas = cab_shade(stack(firings, swell_db, boost_khz))
    engine = exhaust(firings, outlet_db) + casting + gas + turbo(firings)
    return engine + wind(gusts_db, breeze_db) + ticks()


def roll_off(x):
    return signal.sosfilt(signal.butter(12, 15700, fs=SR, output="sos"), x)


def record(dry):
    soft = 1.1 * np.tanh(dry / 1.1)
    cut = signal.sosfilt(signal.cheby2(12, 60, 16200, fs=SR, output="sos"), soft)
    cut = cut * np.clip((N - np.arange(N)) / 300, 0, 1)
    return roll_off(cut)


dry = scene()
out = record(dry)
master(out)
```